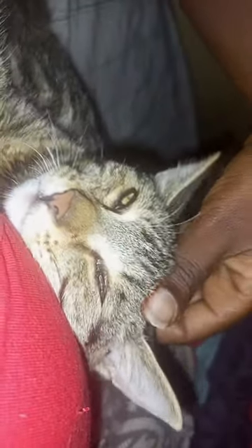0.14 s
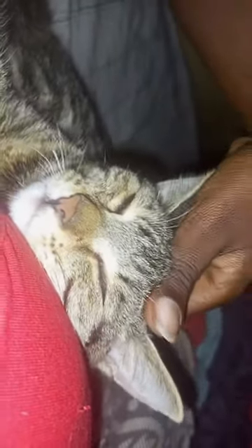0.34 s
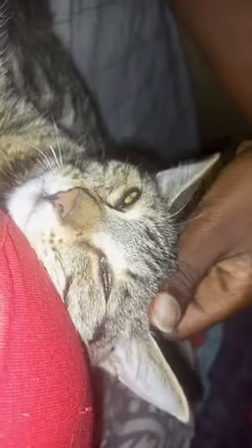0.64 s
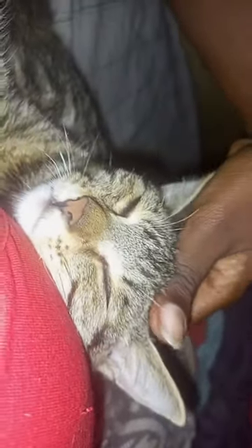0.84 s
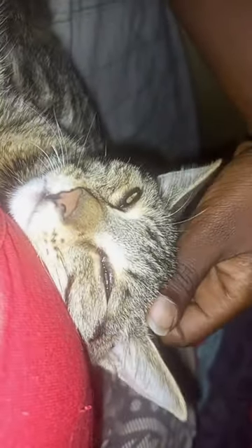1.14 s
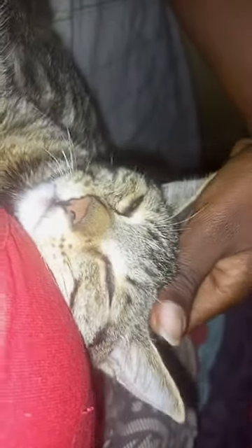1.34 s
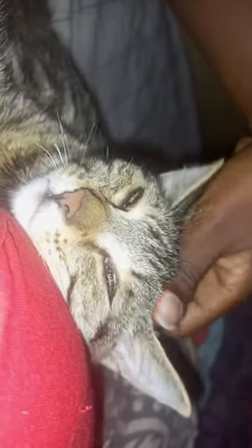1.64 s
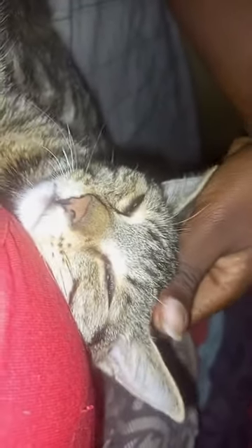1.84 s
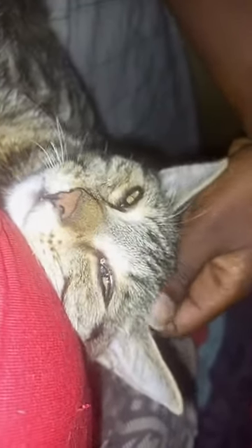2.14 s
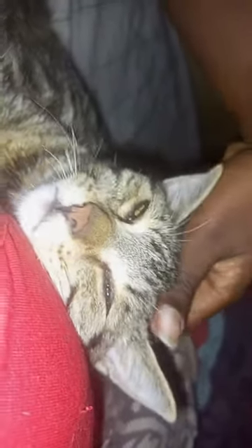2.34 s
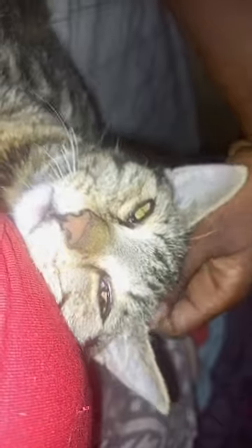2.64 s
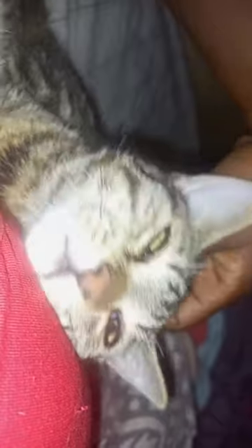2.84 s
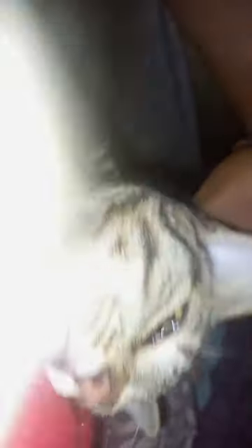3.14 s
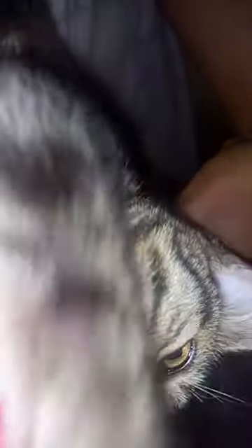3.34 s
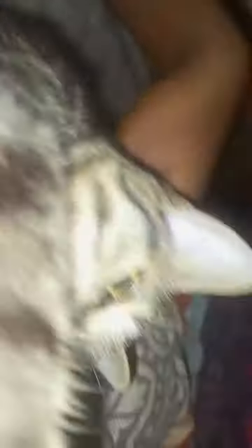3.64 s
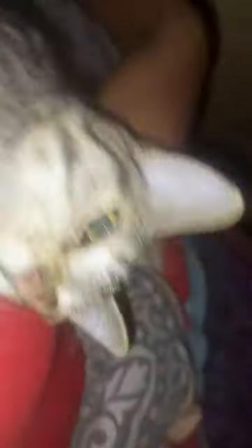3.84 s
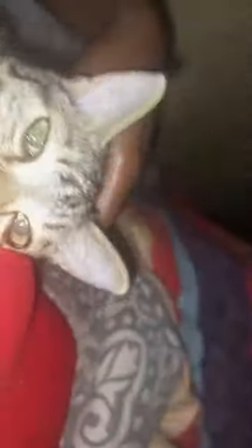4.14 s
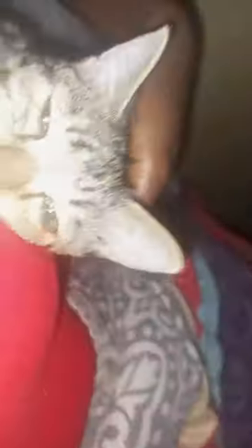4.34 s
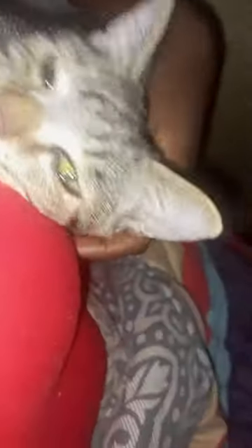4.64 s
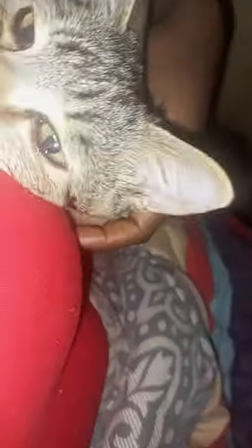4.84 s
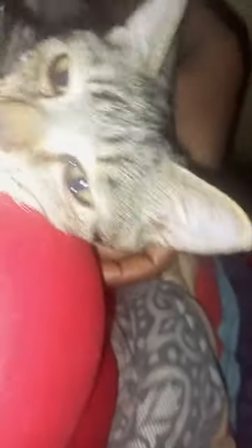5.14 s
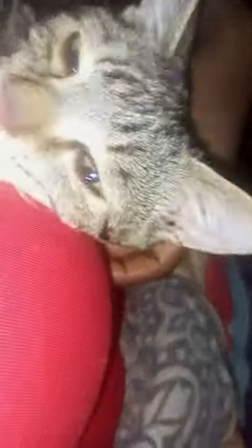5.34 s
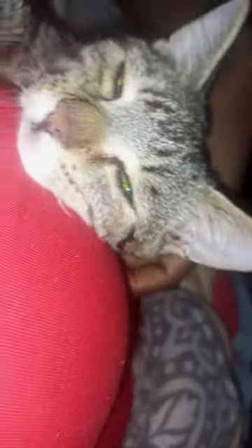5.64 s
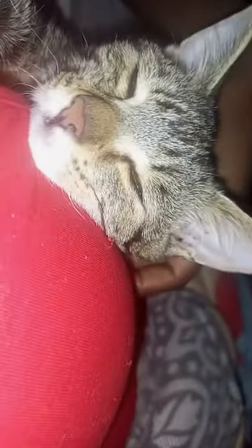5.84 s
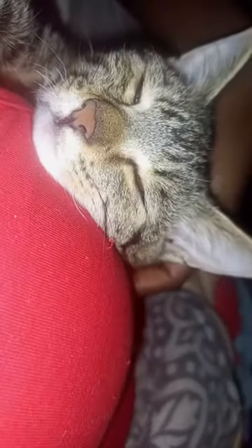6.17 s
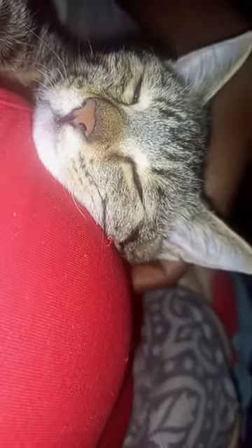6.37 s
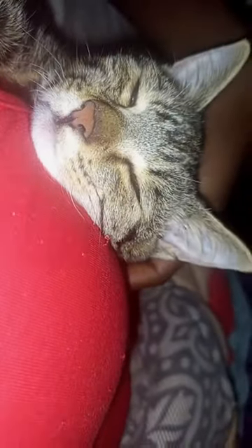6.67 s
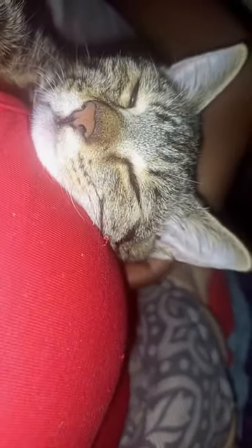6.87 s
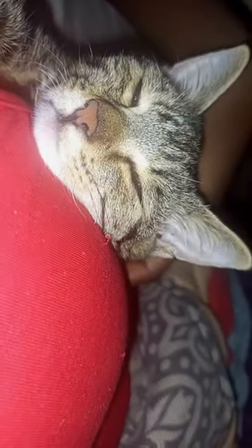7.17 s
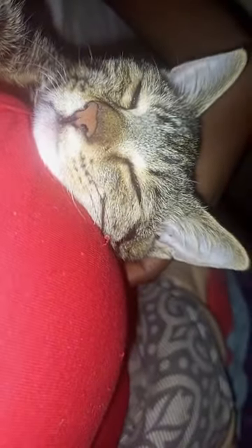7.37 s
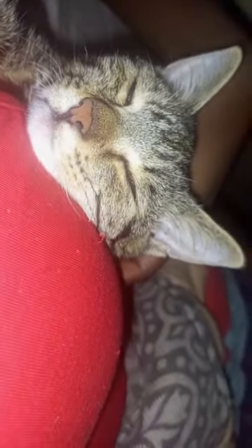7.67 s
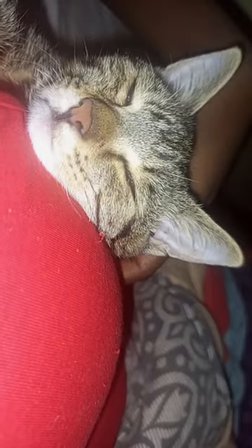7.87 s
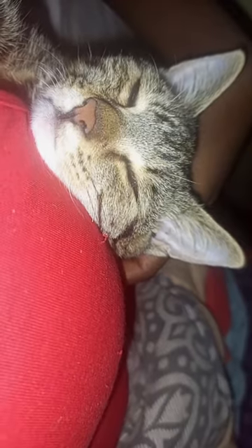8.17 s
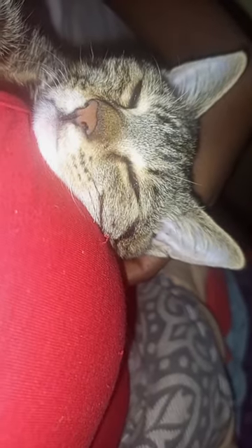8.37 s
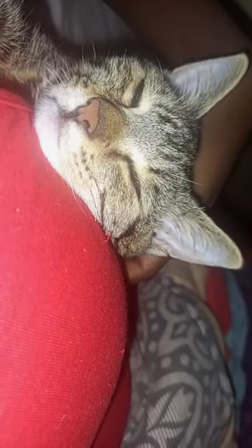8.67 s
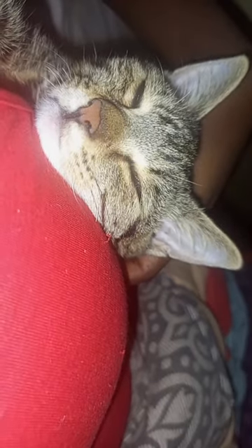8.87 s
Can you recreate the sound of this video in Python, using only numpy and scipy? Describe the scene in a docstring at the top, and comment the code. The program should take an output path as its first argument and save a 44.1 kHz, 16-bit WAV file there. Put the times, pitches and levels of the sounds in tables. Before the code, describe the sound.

Close and dry, a cat's low, fluttering purr runs throughout, alternating between in-breath and out-breath over faint room hiss. A fingertip briefly scuffs the phone early on. Near the middle the grip slides, and the case crackles with a quick cluster of clicks and one loud snap. A few small ticks follow while the gentle purring continues to the end.

```python
"""Kitten purring on a lap

A kitten dozes and purrs, a phone held close to its head in a quiet room. Its larynx shuts and snaps
open about 26 times a second, faster on one stroke of its breath than on the other; its nose rasps and
its chest booms along. Fingers scuff the phone and shift their grip with a burst of sharp clicks."""
import sys
import numpy as np
from scipy import signal
from scipy.fft import rfft, irfft, next_fast_len
from scipy.io import wavfile

SR = 44100
rng = np.random.default_rng(int(sys.argv[2]) if len(sys.argv) > 2 else 0)


def waveform_to_disk(signal):
    """Save audio, clipped to [-1, 1], as 16-bit WAV at the path in sys.argv[1]."""
    frames = np.transpose(np.atleast_2d(signal))
    scaled = np.clip(frames, -1, 1) * 32767
    samples = np.round(scaled).astype(np.int16)
    wavfile.write(sys.argv[1], SR, samples)


N = 397341


def amp(db):
    """Decibels to gain."""
    return 10 ** (np.asarray(db) / 20)


def unit(x):
    """Scale to rms 1."""
    return x / np.sqrt(np.mean(x ** 2) + 1e-20)


def eq_db(points, hz):
    """Read an EQ curve of (Hz, dB) points on a log frequency axis."""
    freqs, levels = np.transpose(points)
    return np.interp(np.log(hz + 1), np.log(freqs + 1), levels)


def automation(rows, outside=None):
    """One curve for each column after the time; beyond the rows, the end values or `outside`."""
    times, *columns = np.transpose(rows)
    return [np.interp(np.arange(N) / SR, times, column, outside, outside) for column in columns]


def swells(rows):
    """A gain with a smooth bell around each (time, length, level) row."""
    t = np.arange(N) / SR
    return sum(amp(db) * np.exp(-2 * ((t - s) / length) ** 2) for s, length, db in rows)


def filtered(x, gain):
    """Apply a gain that depends on frequency."""
    size = next_fast_len(N + SR // 2)
    return irfft(rfft(x, size) * gain(np.fft.rfftfreq(size, 1 / SR)), size)[:N]


def coloured(x, eq):
    """x through an EQ curve, at rms 1."""
    return unit(filtered(x, lambda hz: amp(eq_db(eq, hz))))


def noise(eq):
    """Coloured noise of rms 1."""
    return coloured(rng.standard_normal(N), eq)


def knock(level_db, size=4096):
    """A minimum-phase transient, peak 1, with the spectral shape level_db(Hz)."""
    cepstrum = irfft(np.log(amp(level_db(np.fft.rfftfreq(size, 1 / SR)))))
    cepstrum[1:size // 2] *= 2
    cepstrum[size // 2 + 1:] = 0
    pulse = irfft(np.exp(rfft(cepstrum)))[:size // 2]
    return pulse / np.abs(pulse).max()


def impulses(at, sizes):
    """Impulses of the given sizes at the given samples."""
    return np.bincount(np.clip(at, 0, N).astype(int), sizes, N + 1)[:N]


def knocks(at, sizes, eq):
    """A train of transients, each ringing with the EQ curve."""
    return signal.fftconvolve(impulses(at, sizes), knock(lambda hz: eq_db(eq, hz)))[:N]


def resonance_db(hz, centre_hz, q):
    """Gain in dB of a resonance passed twice."""
    ratio = (hz + 1) / centre_hz
    return -20 * np.log10(1 + (q * (ratio - 1 / ratio)) ** 2)


# Colour of the room tone: (frequency [Hz], gain [dB])
ROOM_EQ = [(25, -4), (100, 14), (400, 14), (900, 6.5), (1200, 1.5), (2500, -3), (6000, -5), (8000, -13),
           (13500, -13), (16000, -23.5)]
def room_tone():
    """The steady, dark hiss of a quiet room."""
    return amp(-65) * noise(ROOM_EQ)


# Dull rubs of the hand: (time [s], length [s], level [dB])
RUB_SWELLS = [(1.04, 0.034, -55.5), (2.04, 0.068, -57.5), (4.44, 0.045, -63), (6.23, 0.037, -62),
              (6.4, .12, -54.5)]
# Their muffled colour: (frequency [Hz], gain [dB])
RUB_EQ = [(60, -23), (120, -8), (172, 3), (240, -8), (350, -17), (1300, -55.5)]
def hand_rub():
    """The hand rubs the phone it holds: a faint low bed with a few swells."""
    return (amp(-65.5) + swells(RUB_SWELLS)) * noise(RUB_EQ)


# Envelope of the skid: (time [s], level [dB])
SKID_ENVELOPE = [(2.382, -71), (2.387, -44), (2.393, -38), (2.411, -42), (2.416, -60)]
# Colour of the skidding fingertip: (frequency [Hz], gain [dB])
SKID_EQ = [(60, -15), (150, -2.5), (600, -4), (930, -14.5), (1100, -6), (2200, 0.5), (2600, -11),
           (3500, -32), (4500, -22), (5300, -35), (12000, -50.5)]
def fingertip_skid():
    """A fingertip skids once, in a short scuff."""
    level_db, = automation(SKID_ENVELOPE, outside=-np.inf)
    return amp(level_db) * noise(SKID_EQ)


# The grip slides over the case: (time [s], relative scrape level [dB], groan level [dB])
GRIP_ENVELOPES = [(4.72, -88.5, -68), (4.79, -59.5, -70), (4.82, -45, -59), (4.865, -42.5, -54.5),
                  (4.90, -47, -46.5), (4.945, -48, -40.5), (4.975, -48.5, -55), (5.015, -53.5, -45),
                  (5.045, -52.5, -64), (5.09, -63.5, -95), (5.3, -69, -87.5), (5.5, -85.5, -91.5)]
# Bright scrape of skin, hollow groan of the case: (frequency [Hz], gain [dB])
SCRAPE_EQ = [(200, -18.5), (1200, -3), (2000, -2), (4000, -2), (6200, 0), (7800, -6), (10000, -12.5),
             (16000, -22.5)]
GROAN_EQ = [(100, -25), (220, -2.5), (340, 1), (620, -17), (900, -9), (1300, -9), (2500, -30)]
def grip_slide(slips_per_s=1500, tail_slips_per_s=70, spread_db=3):
    """Skin sticks and slips in tiny grains, sparser as it settles, and the case groans under it."""
    scrape_db, groan_db = automation(GRIP_ENVELOPES, outside=-np.inf)
    chance = np.interp(scrape_db, [-62, -48], [tail_slips_per_s, slips_per_s]) / SR
    slips = (rng.random(N) < chance) / np.sqrt(chance) * rng.standard_normal(N)
    slips *= amp(spread_db * rng.standard_normal(N).clip(-2, 1))
    friction = unit(slips) + .4 * rng.standard_normal(N)
    scrape = amp(scrape_db + 1) * coloured(friction, SCRAPE_EQ)
    return scrape + amp(groan_db) * noise(GROAN_EQ)


# Ticks and snaps of the phone's case: (time [s], level [dB], pitch [Hz], resonance [Q])
CASE_HITS = [(0.831, -54, 5440, 1.2), (3.3477, -53, 6700, 3), (4.7564, -31, 4900, 1.8),
             (4.7936, -20.5, 5600, 0.22), (4.8223, -15.5, 7000, 0.55), (4.828, -21, 5500, 1),
             (4.8609, -16, 6000, 0.6), (4.8637, -16.5, 4500, 0.56), (4.8632, -28, 1159, 1.5),
             (4.8891, 2.5, 3693, 0.66), (4.916, -29.5, 1152, 1.5), (4.9207, -16, 7500, 1.2),
             (4.9275, -25.5, 1200, 1.5), (4.9389, -11, 2196, .4), (4.947, -22, 4012, .4),
             (4.9728, -23, 4000, 0.77), (4.9792, -25.5, 1601, .6), (4.9994, -22, 5000, 0.297),
             (5.003, -33, 874, 5), (5.0046, -21, 3550, 0.44), (5.0591, -14, 5950, 0.37),
             (5.1157, -38, 9400, 2.7), (5.137, -44, 7400, 3.4), (5.1482, -39.5, 3820, 3),
             (5.1665, -27, 4460, 1.3), (5.212, -40.5, 9800, 1.3), (5.233, -44, 4000, 1.7),
             (5.293, -43, 4000, .5), (5.3658, -43, 7400, 5.1), (6.154, -40.5, 7000, 7.5),
             (6.2333, -40.5, 10030, 1.1), (6.5916, -39.5, 3500, 0.45), (7.138, -22, 6690, 0.98),
             (7.1414, -35.5, 6150, 0.49), (7.6505, -34, 8100, 0.43), (7.658, -28, 8500, 1),
             (8.351, -46.5, 6500, 1.2), (8.7365, -43.5, 4500, 1.3)]
# Colour the case gives every click: (frequency [Hz], gain [dB])
CASE_EQ = [(100, -9), (600, -1.5), (1200, 3), (1900, -2), (2600, -3.5), (5500, -2.5), (7500, -7),
           (8800, -7.5), (16000, -12.5)]
def case_clicks(creep_db=-44, creep_s=.0036, crumble_db=-45, crumble_s=.004097):
    """A finger creeps, the case gives way in one pitched snap, and the contact crumbles away."""
    out, lead = np.zeros(N + SR), SR // 20
    t = np.arange(-lead, lead) / SR
    creep = amp(creep_db) * np.exp(-abs(t) / creep_s)
    crumble = amp(crumble_db) * np.exp(-abs(t) / crumble_s)
    envelope = np.where(t < 0, creep, crumble)
    for s, db, pitch_hz, q in CASE_HITS:
        pulse = knock(lambda hz: eq_db(CASE_EQ, hz) + np.maximum(resonance_db(hz, pitch_hz, q), -27))
        # a hard snap is clean, a faint one carries more friction
        friction = amp(-.5 * db) * envelope * rng.standard_normal(len(t))
        snap = signal.fftconvolve(pulse, (t == 0) + friction)
        out[round(s * SR) - lead:][:len(snap)] += amp(db) * snap
    return out[:N]


# Pulse rate of the larynx: (time [s], rate [Hz])
PURR_RATE = [(0.0, 24.8), (0.2, 28.46), (0.3, 28.85), (0.4, 26.33), (0.5, 25.16), (0.9, 28.62),
             (1.0, 24.54), (1.1, 25.74), (1.2, 25.9), (1.4, 28.02), (1.5, 27.84), (1.7, 24.65),
             (1.9, 26.45), (2.0, 28.02), (2.1, 28.07), (2.2, 25.44), (2.4, 25.57), (2.8, 28.06),
             (3.0, 26.93), (3.1, 24.51), (3.4, 25.83), (3.5, 25.06), (3.6, 28.32), (3.8, 27.86),
             (3.9, 23.97), (4.2, 28.7), (4.3, 28.03), (4.4, 23.79), (4.6, 27.59), (4.8, 28.37),
             (5.0, 24.84), (5.1, 26.24), (5.2, 28.91), (5.3, 27.98), (5.4, 24.42), (5.7, 27.98),
             (5.8, 27.94), (5.9, 24.8), (6.0, 24.86), (6.2, 28.37), (6.3, 27.37), (6.4, 24.11),
             (6.5, 24.93), (6.6, 27.57), (6.7, 28.32), (6.8, 27.67), (6.9, 24.74), (7.0, 25.12),
             (7.2, 27.7), (7.3, 27.67), (7.5, 24.39), (7.9, 28.64), (8.1, 24.49), (8.3, 26.06),
             (8.4, 27.61), (8.5, 27.96), (8.7, 24.87), (9.0, 26.61)]
# Strength of the purr, one swell for each stroke of breath: (time [s], relative level [dB])
PURR_EFFORT = [(0.0, -40.5), (0.13, -46.5), (0.24, -36), (0.42, -45.5), (0.54, -39.5), (0.73, -47.5),
               (0.84, -35.5), (0.91, -44), (0.98, -45.5), (1.06, -41), (1.22, -42), (1.33, -50.5),
               (1.4, -39.5), (1.55, -40), (1.62, -46.5), (1.7, -41.5), (1.86, -45), (1.97, -47),
               (2.04, -39.5), (2.11, -41.5), (2.19, -49), (2.27, -40), (2.42, -45), (2.61, -51),
               (2.69, -41.5), (2.87, -39), (3.05, -44), (3.17, -38.5), (3.29, -40), (3.49, -43.5),
               (3.57, -45.5), (3.64, -39.5), (3.74, -37), (3.85, -47.5), (3.93, -42), (4.05, -42),
               (4.13, -52), (4.2, -40.5), (4.27, -39), (4.34, -47), (4.46, -41), (4.61, -47.5),
               (4.69, -39.5), (4.79, -42.5), (4.94, -48), (5.06, -49), (5.13, -57), (5.21, -42),
               (5.28, -45.5), (5.35, -55), (5.43, -45.5), (5.55, -48), (5.66, -49.5), (5.77, -42),
               (5.88, -50), (5.96, -43), (6.07, -46), (6.15, -50.5), (6.22, -43), (6.33, -50.5),
               (6.45, -44.5), (6.53, -43), (6.61, -54), (6.68, -43), (6.86, -48), (6.98, -42.5),
               (7.1, -46.5), (7.17, -51.5), (7.24, -39.5), (7.35, -44), (7.43, -48.5), (7.55, -39.5),
               (7.78, -54), (7.85, -41.5), (7.92, -43.5), (8.03, -49.5), (8.11, -39.5), (8.23, -42.5),
               (8.35, -49.5), (8.46, -41), (8.53, -39.5), (8.64, -51), (8.72, -41.5), (9.0, -47.5)]
def breath():
    """The breath rides the purr's rate and strength: two control curves for chest and larynx."""
    return *automation(PURR_RATE), *automation(PURR_EFFORT)


# Low swells of the chest: (time [s], length [s], relative level [dB])
BOOM_SWELLS = [(.24, 0.046, -53), (.36, 0.081, -52.5), (.5, 0.035, -50), (.85, 0.12, -57),
               (1.1, 0.075, -53), (1.45, 0.17, -58), (2.1, .1, -54), (2.34, 0.031, -54.5),
               (2.76, 0.065, -53.5), (2.9, 0.025, -49), (3.76, 0.063, -60), (5.4, 0.036, -61.5),
               (6.19, 0.053, -53.5), (6.47, 0.052, -60.5), (7.06, 0.075, -62.5), (7.18, 0.056, -53.5),
               (7.39, 0.05, -51.5), (7.6, 0.056, -50), (8.6, 0.13, -57)]
# Colour of its rumble: (frequency [Hz], gain [dB])
BOOM_EQ = [(25, -24), (48, -22.5), (65, -6.5), (82, -0.5), (110, -4.5), (200, -28), (500, -70)]
def chest(rate_hz, effort_db, fourth_db=-8):
    """The chest resonates on the purr's harmonics 3 and 4; they beat once a cycle over a rough boom."""
    phase = 2 * np.pi * np.cumsum(rate_hz) / SR
    tone = np.sin(3 * phase) + amp(fourth_db) * np.sin(4 * phase - 1.2)
    envelope = amp(effort_db - 28) + swells(BOOM_SWELLS)
    return envelope * (amp(2) * tone + amp(-7.5) * noise(BOOM_EQ))


# The nose turns raspy: (time [s], length [s], relative level [dB])
RASP_SWELLS = [(.82, 0.041, -85), (1.28, 0.032, -64), (1.48, 0.03, -84), (2.05, 0.081, -82),
               (3.23, .22, -66)]
# Breathy flutter of the throat, thin rasp of the nose: (frequency [Hz], gain [dB])
FLUTTER_EQ = [(60, -30), (200, -7.5), (400, 4), (850, 4), (1100, -21), (2500, -28), (6000, -54)]
RASP_EQ = [(900, -22.5), (1400, -3), (1900, -2), (2350, -1), (2750, -15), (5300, -19.5), (7500, -35)]
def throat_and_nose(fold_hits, cycle_starts, puff_s=.0049):
    """Each movement of the vocal folds sends a puff of air through throat and nose."""
    puffs = unit(signal.lfilter([1], [1, -np.exp(-1 / (puff_s * SR))], fold_hits))
    flutter = amp(-66.5) * puffs * noise(FLUTTER_EQ)
    # the damp nose catches the air on some cycles more than on others
    catch_db = 5 * rng.standard_normal(len(cycle_starts)).clip(-2, 2)
    catch = amp(np.interp(np.arange(N), cycle_starts, catch_db - 82.5))
    rasp = (catch + amp(-3.5) * swells(RASP_SWELLS)) * puffs * noise(RASP_EQ)
    return flutter + rasp


# The folds snap open on the fast and slow strokes, and thud shut: (frequency [Hz], gain [dB])
FAST_SNAP_EQ = [(40, -24.5), (90, -7.5), (230, 0.5), (450, 4), (770, 4), (900, -1.5), (1000, -17.5),
                (1150, -30.5), (2000, -32), (9000, -75)]
SLOW_SNAP_EQ = [(40, -27), (90, -15), (230, -0.5), (450, -7), (600, -3), (780, -3.5), (900, -7),
                (1150, -30), (2000, -35.5), (9000, -75)]
SHUT_EQ = [(40, -17.5), (80, -3), (170, 0.5), (300, -2), (450, -10), (800, -7), (950, -17), (1150, -38),
           (8000, -75)]
def larynx(rate_hz, effort_db, turn_hz=27.08, fast_gap_s=.0104, slow_gap_s=.0131, shut_follow=.68):
    """Each cycle is a soft shutting, then a sharp opening; both flip polarity when the airflow turns."""
    cycles = np.cumsum(rate_hz) / SR + .5
    starts = np.flatnonzero(np.diff(np.floor(cycles)))
    fast = rate_hz[starts] > turn_hz
    jitter = rng.standard_normal((len(starts), 3)) * [.9, .0003, 1.2]
    snap_jitter_db, gap_jitter_s, shut_jitter_db = jitter.T
    opens = starts - np.where(fast, .0012, .0008) * SR  # about a millisecond early
    snap = amp(effort_db[starts] + snap_jitter_db)
    fast_snaps = knocks(opens, snap * fast * amp(1.5), FAST_SNAP_EQ)
    slow_snaps = knocks(opens, snap * ~fast * amp(2), SLOW_SNAP_EQ)
    # the folds stay shut longer on the slow stroke
    closes = opens - (np.where(fast, fast_gap_s, slow_gap_s) + gap_jitter_s) * SR
    shut = amp(-42 + shut_follow * (effort_db[starts] + 39.5) + shut_jitter_db)
    thuds = knocks(closes, np.where(fast, -amp(3), amp(1.17)) * shut, SHUT_EQ)
    air = throat_and_nose(impulses(opens, snap) + impulses(closes, shut), starts)
    return fast_snaps - slow_snaps + thuds + air


def scene():
    """Kitten and handling noise, close and dry, over the room tone, in mono."""
    rate_hz, effort_db = breath()
    purr = larynx(rate_hz, effort_db) + chest(rate_hz, effort_db)
    handling = case_clicks() + grip_slide() + fingertip_skid() + hand_rub()
    return (room_tone() + handling + purr)[None]


def record(dry, port_hz=15000, port_width_hz=450, port_db=13, top_hz=15600):
    """The microphone port rings in the top treble; the phone clips at full scale, then cuts the highs."""
    heard = filtered(dry[0], lambda hz: amp(port_db / (1 + ((hz - port_hz) / port_width_hz) ** 2)))
    return filtered(np.clip(heard, -1, 1), lambda hz: hz < top_hz)[None]


dry = scene()
out = record(dry)
waveform_to_disk(out)
```